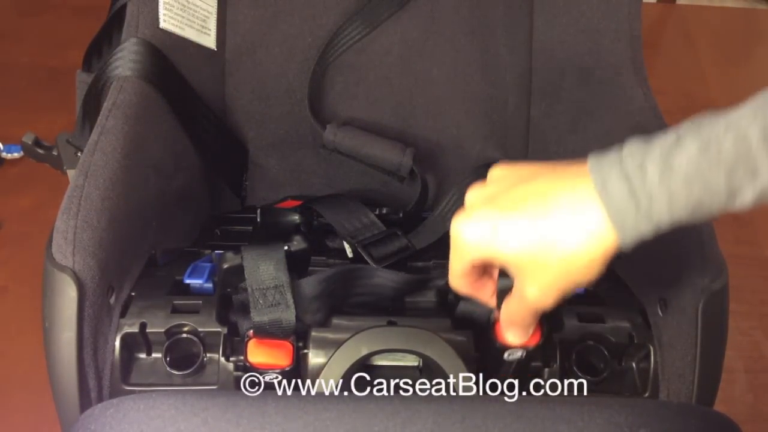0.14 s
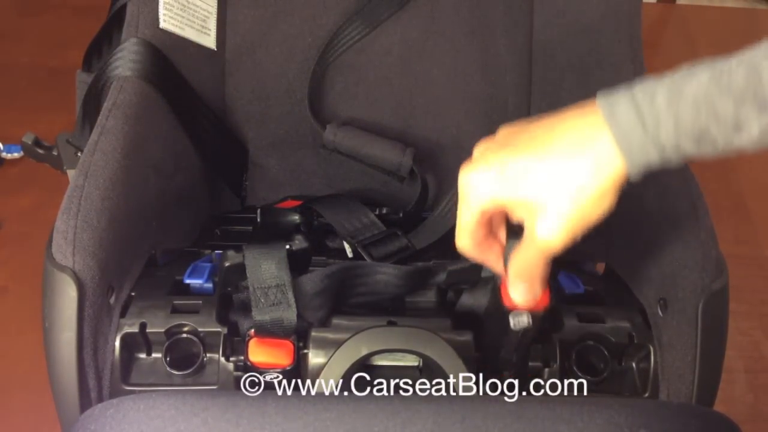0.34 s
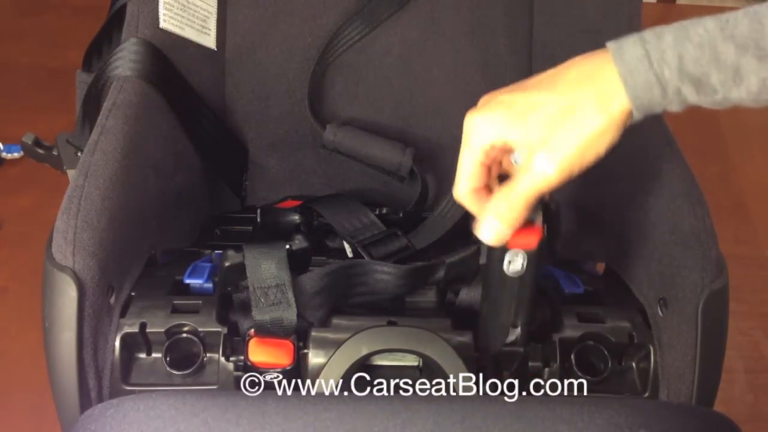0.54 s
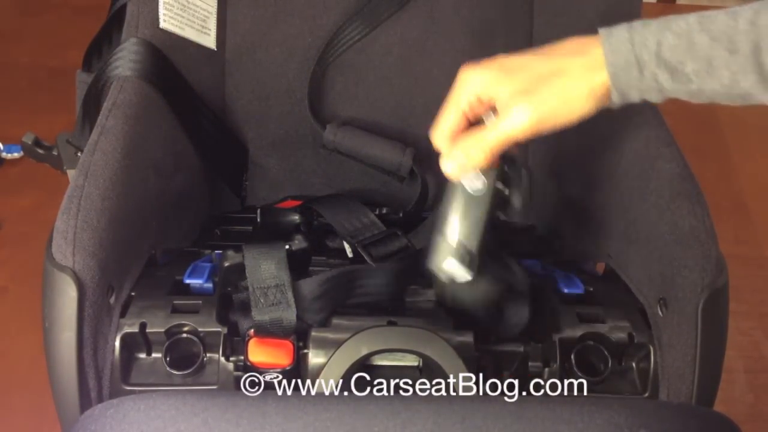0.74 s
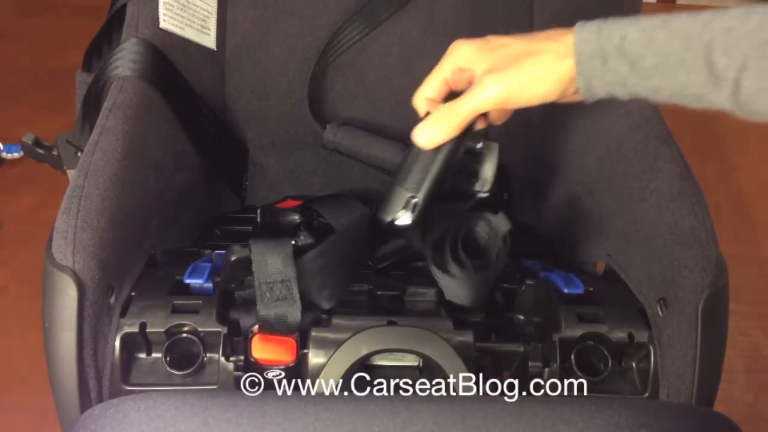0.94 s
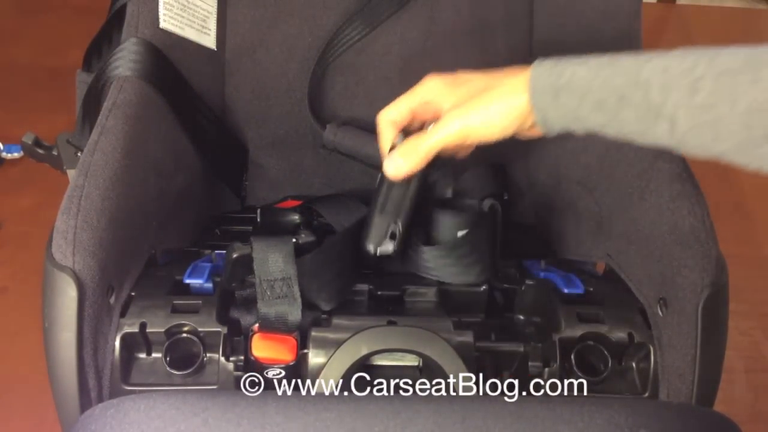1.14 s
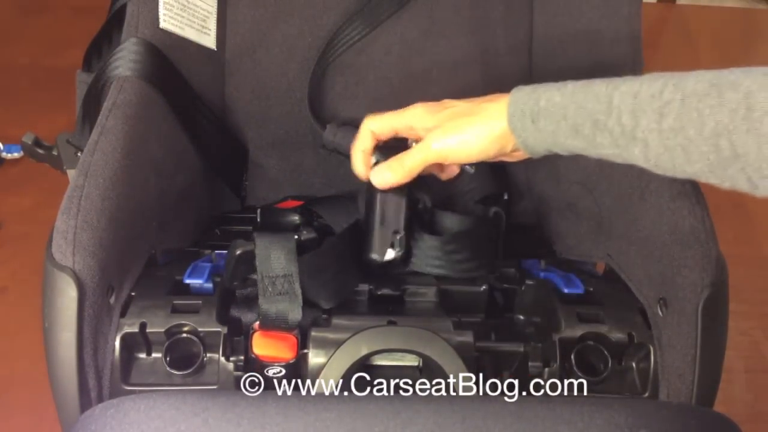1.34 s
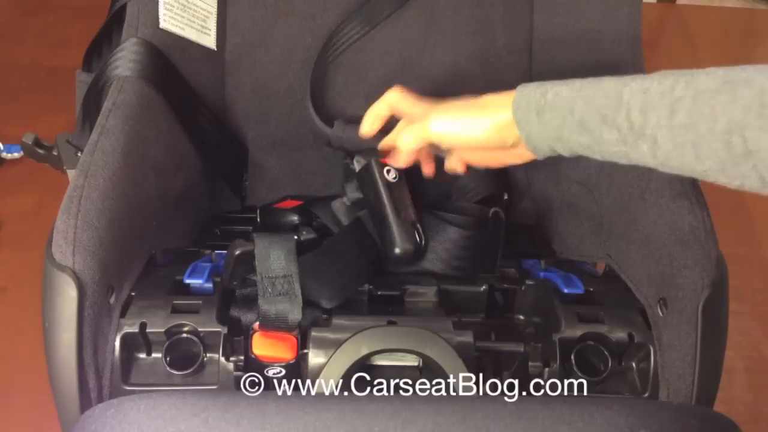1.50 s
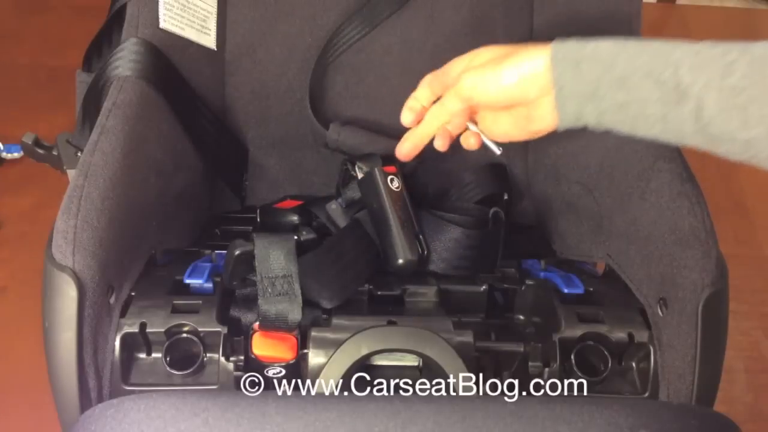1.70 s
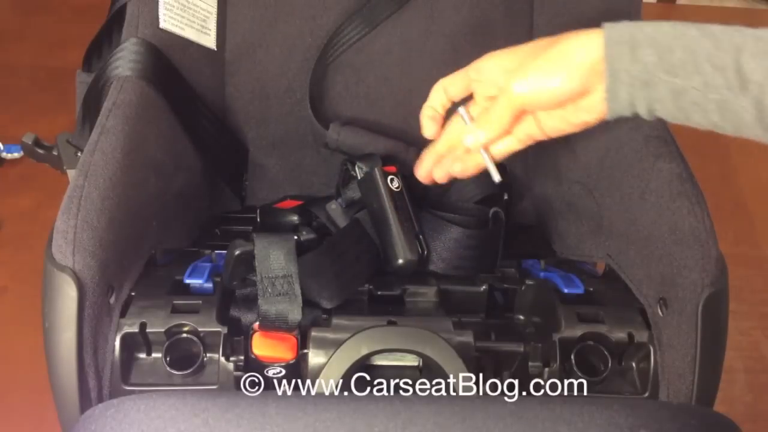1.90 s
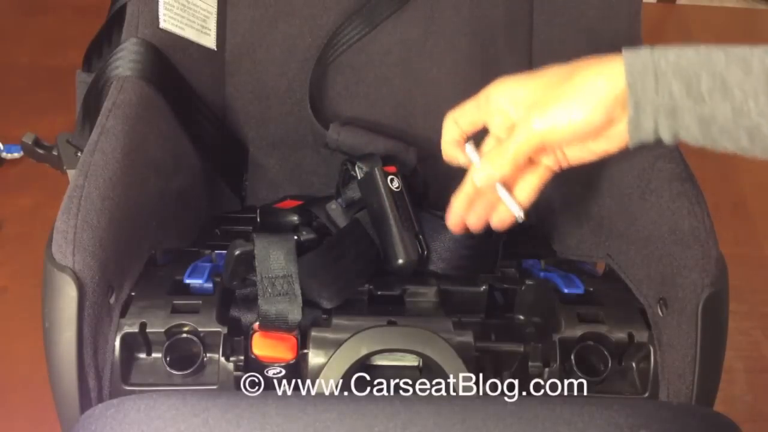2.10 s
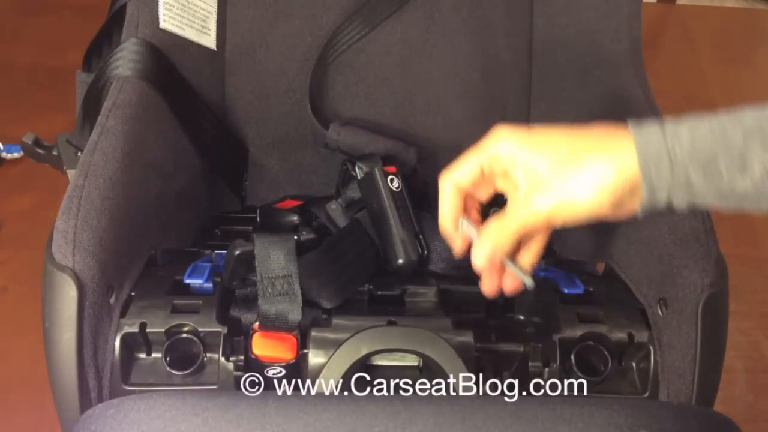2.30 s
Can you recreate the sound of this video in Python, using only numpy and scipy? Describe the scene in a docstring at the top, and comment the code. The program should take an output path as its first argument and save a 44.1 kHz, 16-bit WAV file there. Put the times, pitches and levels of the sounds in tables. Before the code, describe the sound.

Sharp plastic clicks and a hollow clack from a child seat's strap connector being handled.

```python
"""A plastic latch clicks and snaps free as a hand works a strap connector out of a child seat's base.
Its hook scrapes the slot and the webbing slides after it; the metal jaw clinks, then the connector
knocks down on the hollow seat and settles. Each impact excites the damped modes of the struck part,
while friction makes noise from many tiny slips. A small quiet room adds a short reverberation."""
import sys
import numpy as np
from scipy import signal
from scipy.fft import rfft, irfft
from scipy.io import wavfile

SR = 44100
rng = np.random.default_rng(int(sys.argv[2]) if len(sys.argv) > 2 else 0)


def materialize(psi):
    """Save the field psi as 16-bit PCM at rate SR to the path in sys.argv[1].

    A 1-D psi becomes a single channel; in a 2-D psi each row is a channel.
    """
    bounded = np.clip(np.atleast_2d(psi).T, -1, 1)
    quanta = np.round(bounded * 32767).astype(np.int16)
    wavfile.write(sys.argv[1], SR, quanta)


N = 103635
T = np.arange(SR // 2) / SR  # time axis of one decay [s]

# Impacts of the latch, and of the connector on the seat:
# (time [s], level [dB], low-pass [Hz], rise [s], pitch [ratio], thud level [dB], thud pitch [ratio])
LATCH_CLICKS = [(.1085, -60, 2980, .002, 1.1, -54, 1.1), (.1125, -62, 3000, .002, 1.6, -45, 1.08),
                (.1165, -53.5, 5000, 0.00085, 1.12, -42.5, 0.77),
                (.135, -52.5, 3600, 0.0025, 0.51, -44, 0.8), (.1588, -37.5, 6100, 0.00064, 0.99, -45, 0.98),
                (.179, -45, 4500, 0.0031, 0.71, -58, 0.82), (.192, -49.5, 10000, .001, 0.9, -62, 0.67),
                (.2152, -40, 10120, 0.0021, 1.05, -56, 0.82),
                (.2319, -17.5, 16000, .0027, 1.0, -44.5, 1.02),
                (.2538, -27.5, 7200, 0.00096, 1.05, -43.5, .85),
                (.4238, -42.5, 3120, .0015, 0.62, -39.5, 1.0), (.444, -38, 3200, 0.0007, .82, -53, 0.82)]
SEAT_KNOCKS = [(.84, -54.5, 1000, 0.0016, 0.6, -81, 1.2), (.852, -48, 1480, 0.0026, 0.68, -69, 0.92),
               (.881, -57.5, 995, 0.0011, 0.58, -59.5, 1.34),
               (1.266, -43.5, 3000, 0.0023, 1.36, -40.5, 1.05),
               (1.2885, -27.5, 10200, 0.00035, 0.98, -32, 1.0),
               (1.3025, -51, 4500, 0.00068, .94, -44, 0.87), (1.3095, -43.5, 4000, 0.0035, .9, -42, 0.992),
               (1.341, -48.5, 4000, 0.0015, 1.01, -53, 1.2), (1.367, -48.5, 4000, 0.0038, .96, -58, 0.91),
               (1.385, -59, 3000, 0.0024, 1.4, -69, 1.1), (1.6828, -42, 3200, 0.00034, 1.27, -52.5, 0.97),
               (1.6845, -41.5, 2010, 0.00049, .8, -39.5, 0.96),
               (1.691, -50, 5020, 0.0024, 1.12, -43.5, 1.08)]
# Normal modes of each part: (frequency [Hz], relative level [dB], T60 [s])
LATCH_MODES = [(1480, -13.5, 0.018), (1890, -9.5, 0.031), (2366, -5, 0.036), (2470, -22, .22),
               (3050, -6.5, 0.03), (3580, 3.5, 0.022), (4175, -3.5, 0.019), (5910, -4, 0.02),
               (6680, -11, 0.027), (8000, -8.5, 0.02), (10040, -17, 0.022), (11560, -6, 0.018),
               (12450, -9, 0.015)]
SLOT_WALL_MODES = [(130.3, -17, 0.26), (277.3, -10.5, 0.14), (331.4, 0, 0.083), (389, 4.5, 0.033),
                   (466, -5, 0.018), (740, -7.5, 0.05)]
CONNECTOR_MODES = [(592, -8.5, 0.054), (687, -11.5, 0.042), (853, -7.5, 0.04), (1320, -10, 0.098),
                   (1453, -7.5, 0.044), (1707, -8.5, 0.027), (1830, -12.5, 0.05), (2180, 1.5, 0.026),
                   (2396, -3, 0.033), (3270, -15, 0.034)]
SEAT_PAN_MODES = [(102, -11, 0.18), (134.3, -17, 0.11), (189.5, -8.5, 0.21), (273, -5.5, 0.12),
                  (325.6, -3, 0.072), (408.6, -5.5, 0.081), (466, -3, 0.034), (502, -3, 0.054)]
HOOK_MODES = [(1550, -17.5, 0.031), (1960, -12, 0.018), (3230, 3, .016), (3375, -17.5, 0.11),
              (5210, -8, 0.013), (7590, -3, .01), (8120, -2.5, 0.014)]
JAW_MODES = [(5198, -2.5, 0.059), (5674, -4, 0.066), (6240, -15, .045), (9060, -0.5, 0.037),
             (10270, -16, 0.043), (11050, -10.5, 0.039), (13600, -4.5, 0.031)]
# Spectra of contact cracks, friction and background: (frequency [Hz], relative spectral density [dB])
LATCH_SPECTRUM = [(100, -34), (350, -22), (600, -24.5), (780, -13.5), (1050, -20), (1800, -4), (3600, -9),
                  (5000, -10), (7000, -10), (9000, -18.5), (12500, -8.5), (16000, -22)]
CONNECTOR_SPECTRUM = [(70, -9), (300, 10.5), (800, -2.5), (1100, 4.5), (2200, 3.5), (3200, -7.5),
                      (6000, -5), (9000, -20), (16000, -14)]
METAL_SPECTRUM = [(200, -8.5), (1500, -8), (3500, -6), (5500, 7.5), (7500, -4.5), (11000, -9.5),
                  (16000, -14)]
FRICTION_SPECTRUM = [(100, -23.5), (300, 4), (700, -4.5), (1100, -4.5), (2000, -1.5), (3000, -7),
                     (4100, -2.5), (5200, -5.5), (7300, -9), (9500, -11.5), (16000, -14)]
BACKGROUND_SPECTRUM = [(15, -50), (25, -24.5), (43, -11.5), (80, -12.5), (130, -5), (249, -9.5),
                       (277, -13.5), (309, -13), (405, -22.5), (560, -21), (1100, -31), (1400, -32),
                       (3080, -24.5), (14400, -27), (16000, -30.5)]
# Sliding strokes of plastic, webbing and hand:
# (peak time [s], swell [s], fade [s], level [dB], high-pass [Hz], low-pass [Hz])
RUB_STROKES = [(.09, 0.035, 0.082, -61.5, 149, 4550), (.2, 0.063, 0.073, -59, 990, 5000),
               (0.387, 0.0059, 0.0038, -47.5, 1400, 12800), (0.371, 0.014, 0.1, -63, 298, 4000),
               (.76, 0.072, 0.072, -67, 250, 2580), (0.804, 0.046, 0.06, -61.5, 1730, 8260),
               (1.49, 0.055, .06, -60, 290, 2950), (1.51, 0.019, 0.012, -56, 2030, 8000),
               (.2, 0.084, 0.1, -61.5, 80.1, 150), (1.05, 0.22, 0.28, -74.5, 697, 4030),
               (2.14, .05, 0.051, -70.5, 90.1, 120)]
# Creaks of the connector in the fingers: (peak time [s], spread [s], frequency [Hz], level [dB])
FINGER_CREAKS = [(.615, 0.0093, 1690, -63), (.616, 0.0077, 2980, -71), (0.984, 0.0049, 1460, -64),
                 (1.23, 0.012, 2080, -63), (1.231, 0.0097, 4040, -67), (.085, 0.032, 4030, -68)]
# Reverberation time of the room: (frequency [Hz], T60 [s])
ROOM_DECAY = [(100, 0.41), (300, 0.36), (1000, 0.4), (2500, .33), (6000, 0.25), (14000, 0.15)]


def latch_clicks():
    """Impact excitation: the latch snaps free, ringing its own modes and those of the slot wall."""
    return plastic_impacts(LATCH_CLICKS, LATCH_MODES, LATCH_SPECTRUM, SLOT_WALL_MODES,
                           crack_db=-2, crack_t60=0.019)


def connector_knocks():
    """Structural coupling: the connector strikes the hollow seat and drives its low modes."""
    return plastic_impacts(SEAT_KNOCKS, CONNECTOR_MODES, CONNECTOR_SPECTRUM, SEAT_PAN_MODES,
                           crack_db=0.5, crack_t60=0.037)


def plastic_impacts(impacts, modes, spectrum, shell_modes, crack_db, crack_t60):
    """Energy transfer: each blow rings a small hard part, and the hollow shell thuds just after."""
    thud_lag_s, thud_rise_s = 0.0023, 0.0043
    out = np.zeros((2, N))
    for s, db, cutoff_hz, rise_s, pitch, thud_db, thud_pitch in impacts:
        blow = strike(modes, spectrum, crack_db, crack_t60, rise_s, pitch)
        add(out, s, amp(db) * low_pass(blow, cutoff_hz))
        thud = np.minimum(T / thud_rise_s, 1) * ring(shell_modes, thud_pitch)
        thud_gains = amp([[thud_db], [thud_db - 1]])  # direct, scattered
        add(out, s + thud_lag_s, thud_gains * thud)
    return high_pass(out, hz=89)


def strike(modes, spectrum, crack_db, crack_t60, rise_s, pitch=1):
    """Impulse response: clear modes plus a crack of dense, damped ones, as rows (direct, scattered)."""
    shifted_spectrum = [(pitch * hz, db) for hz, db in spectrum]
    crack = coloured(rng.standard_normal(len(T)), shifted_spectrum) * amp(crack_db - 60 * T / crack_t60)
    tone = ring(modes, pitch)
    scattered = amp(-5) * tone + amp(4) * crack
    return np.minimum(T / rise_s, 1) * np.array([tone + crack, scattered])


def ring(modes, pitch=1):
    """Modal superposition: damped sines of alternating sign; grip and contact point shift the pitch."""
    return sum((-1) ** k * amp(db - 60 * T / t60) * np.sin(2 * np.pi * pitch * hz * T)
               for k, (hz, db, t60) in enumerate(modes))


def hook_slip():
    """Sudden release: the hook slips off the edge of the slot and vibrates freely."""
    out = np.zeros((2, N))
    slip = strike(HOOK_MODES, METAL_SPECTRUM, crack_db=-14, crack_t60=0.015, rise_s=0.0029)
    add(out, s=0.3862, sound=amp(-28) * slip)
    return out


def jaw_clink():
    """Elastic rebound: the metal jaw strikes and bounces once, ringing its high modes each time."""
    clink_s, bounce_s = 1.2548, 0.0045
    out = np.zeros((2, N))
    for s, db in [(clink_s, -33.5), (clink_s + bounce_s, -38)]:
        clink = strike(JAW_MODES, METAL_SPECTRUM, crack_db=-6.5, crack_t60=0.04, rise_s=0.00053)
        add(out, s, amp(db) * clink)
    return out


def rubbing():
    """Sliding friction: plastic and webbing make dense tiny slips that swell and fade with each move."""
    slips_per_s, spread_db = 2500, 2
    t, out = np.arange(N) / SR, np.zeros(N)
    for s, swell_s, fade_s, db, low_hz, high_hz in RUB_STROKES:
        slips = rng.standard_normal(N) * (rng.random(N) < slips_per_s / SR)
        slips *= amp(spread_db * np.minimum(rng.exponential(1, N), 4))
        friction = high_pass(low_pass(coloured(slips, FRICTION_SPECTRUM), high_hz), low_hz)
        stroke = np.exp(-0.5 * ((t - s) / np.where(t < s, swell_s, fade_s)) ** 2)
        out += amp(db) * stroke * unit_rms(friction)
    return out


def creaks():
    """Resonance: brief friction in the fingers excites one narrow band of noise."""
    relative_bandwidth = 0.23
    t, f, out = np.arange(N) / SR, np.fft.rfftfreq(N, 1 / SR), np.zeros(N)
    for s, spread_s, hz, db in FINGER_CREAKS:
        detuning = 2 * (f / hz - 1) / relative_bandwidth
        band = irfft(rfft(rng.standard_normal(N)) / (1 + detuning ** 2), N)
        out += amp(db) * np.exp(-0.5 * ((t - s) / spread_s) ** 2) * unit_rms(band)
    return out


def room(scattered):
    """Reverberation: quick reflections from seat and floor, and a short tail whose treble dies first."""
    tail_db, early_db, early_t60 = -12.5, -17, 0.071
    hz, t, bands = signal.stft(rng.standard_normal(len(T)), SR, nperseg=256)
    decay = amp(-60 * t / at_frequency(ROOM_DECAY, hz)[:, None])
    tail = signal.istft(bands * decay, SR, nperseg=256)[1][:len(T)]
    early = rng.standard_normal(len(T)) * amp(-60 * T / early_t60)
    response = amp(tail_db) * tail / np.linalg.norm(tail) + amp(early_db) * early / np.linalg.norm(early)
    out = np.zeros(N)
    add(out, s=0.004, sound=signal.fftconvolve(scattered, response))
    return out


def background():
    """Stationary noise: a faint, steady rumble and hiss."""
    return amp(-65.5) * coloured(rng.standard_normal(N), BACKGROUND_SPECTRUM)


def low_pass(x, hz):
    """Contact compliance: a softer contact loses the treble."""
    return signal.sosfilt(signal.butter(2, min(hz, 0.45 * SR), fs=SR, output="sos"), x)


def high_pass(x, hz):
    """High-pass: the sound is thinned below hz, leaving little bass."""
    return signal.sosfilt(signal.butter(2, hz, "high", fs=SR, output="sos"), x)


def coloured(x, spectrum):
    """Spectral shaping: weights x by a spectrum, at rms 1."""
    gain = amp(at_frequency(spectrum, np.fft.rfftfreq(len(x), 1 / SR)))
    return unit_rms(irfft(rfft(x) * gain, len(x)))


def at_frequency(table, hz):
    """Interpolation on a log-frequency axis."""
    f, value = np.transpose(table)
    return np.interp(np.log(hz + 1), np.log(f + 1), value)


def amp(db):
    """Amplitude ratio of a level in decibels."""
    return 10 ** (np.asarray(db) / 20)


def unit_rms(x):
    """Normalisation to rms 1."""
    return x / np.sqrt(np.mean(x ** 2) + 1e-20)


def add(mix, s, sound):
    """Superposition: a sound joins the mix at time s."""
    part = mix[..., round(s * SR):][..., :sound.shape[-1]]
    part += sound[..., :part.shape[-1]]


def scene():
    """Linear superposition: direct sound, its reverberation and the background sum to one channel."""
    impacts = latch_clicks() + connector_knocks() + hook_slip() + jaw_clink()
    direct, scattered = impacts + rubbing() + creaks()
    return (direct + room(scattered) + background())[None]


def record(dry):
    """Band limiting: a linear-phase low-pass filter removes the highest treble."""
    cutoff_hz = 15600
    kernel = signal.firwin(401, cutoff_hz, window=("kaiser", 8), fs=SR)
    return signal.oaconvolve(dry, kernel[None], "same")


dry = scene()
out = record(dry)
materialize(out)
```